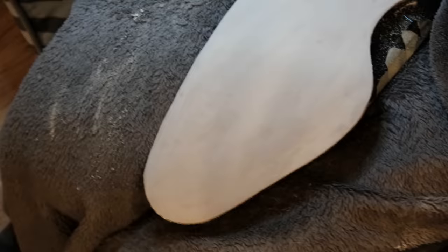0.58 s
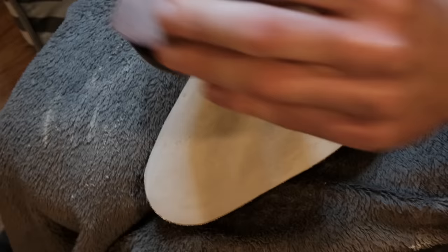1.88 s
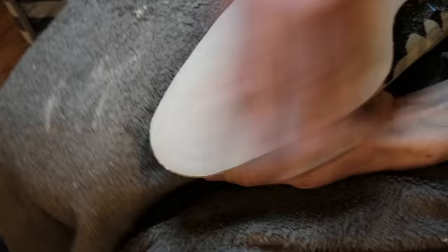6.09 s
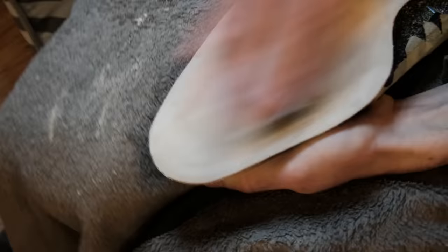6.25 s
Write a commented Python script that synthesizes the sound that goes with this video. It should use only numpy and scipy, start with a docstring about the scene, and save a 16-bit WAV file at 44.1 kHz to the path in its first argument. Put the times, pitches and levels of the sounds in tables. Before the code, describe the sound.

At the very start a shoe shifts on a lap with a soft bump and a small crunch, and a hand wipes once along the leather sole, a swish gone by 0.5 seconds. Faint rustles and a few clicks follow as sandpaper is handled. From about 1.5 to 4 seconds the stiff paper is folded and gripped, sliding over the fingers and crackling with many sharp, irregular snaps, busiest near the end. A quieter second follows, with light rustles and a few ticks. At 5 seconds the sanding starts: a dry, hissing rasp rubbed to and fro over the sole, about seven strokes a second, with a faint hollow tone underneath. Grit catches in small clicks, the sharpest near 5.8 seconds. The strokes continue until about 8 seconds. Everything is close, in a small, quiet, dry workshop.

```python
"""Hand-sanding a leather sole

A shoe on a lap in a quiet workshop is shifted and wiped once. Sandpaper is folded and gripped: it
slides over the fingers, and its creases buckle in snaps that ring the sole. It is then rubbed to and fro,
about seven strokes a second; countless grain impacts merge into a rasp that follows the hand's speed."""
import sys
import numpy as np
from scipy import signal
from scipy.fft import rfft, irfft
from scipy.io import wavfile
from scipy.ndimage import uniform_filter1d, minimum_filter1d

SR = 44100
rng = np.random.default_rng(int(sys.argv[2]) if len(sys.argv) > 2 else 0)


def store_pcm(level_fs):
    """Save levels as 16-bit WAV."""
    pcm = np.round(np.clip(level_fs, -1, 1) * 32767).astype(np.int16)
    wavfile.write(sys.argv[1], SR, np.atleast_2d(pcm).T)


N = 351918
TIME = np.arange(N) / SR

# spectra of the coarse rasp and the fine hiss: frequency_hz, level_db
RASP_SPECTRUM = [(100, -51), (1000, -52), (1500, -25), (1900, -15), (2400, 0.5), (3200, 2.5), (4600, -1.5),
                 (6300, -1), (8000, -4.5), (16000, -12)]
HISS_SPECTRUM = [(1500, -53), (3000, -8), (6000, 2.5), (8000, -2), (10000, 2.5), (16000, 0)]
# the hand loops round its turns at first, later stops almost dead: time_s, turn_speed_fraction
TURN_SPEEDS = [(5.0, 0), (5.16, 0.32), (6.5, 0.35), (7.35, 0.02), (7.65, 0.03), (7.85, 0.48)]
# sanding strokes, each lasting until the next: start_s, level_db, relative_hiss_db
STROKES = [(5.045, -39, -4.5), (5.164, -40, -6), (5.343, -40, -1.8), (5.484, -39, -4.5), (5.632, -40.5, -2),
           (5.771, -40, -2), (5.918, -39, -3.5), (6.055, -41, -3.5), (6.2, -39, -3), (6.339, -40.5, -2.5),
           (6.487, -39, -2), (6.639, -39, -1.5), (6.792, -39, -3), (6.934, -40.5, -2.5),
           (7.075, -40.5, -1.5), (7.213, -38.5, -0.5), (7.357, -39, -3), (7.505, -39.5, -2.5),
           (7.654, -41, 0), (7.81, -41, 0)]
TURNS_S = [row[0] for row in STROKES] + [7.985]  # the last stroke ends here


def sanding(paper_hz=4930, scatter_octaves=0.19, fastest_at=0.63):
    """Friction noise grows with sliding speed: the rasp gently, the fine hiss steeply."""
    out = np.zeros(N)
    for (start, db, hiss_db), end in zip(STROKES, TURNS_S[1:]):
        n = int((end - start) * SR)
        travel = np.interp(np.arange(n) / n, [0, fastest_at, 1], [0, .5, 1])
        slowest = np.interp(start + TIME[:n], *np.transpose(TURN_SPEEDS))
        speed = slowest + (1 - slowest) * np.abs(np.sin(np.pi * travel))
        coarse = shape(grit(n, per_s=15000, spread_db=4.0), RASP_SPECTRUM)
        # the paper under the fingers rings a little differently on each pass
        hz = paper_hz * 2 ** (scatter_octaves * rng.standard_normal())
        rasp = unit(shimmer(coarse + .75 * resonance(coarse, hz, q=3.5), share=.35))
        hiss = unit(shape(grit(n, per_s=30000, spread_db=5.5), HISS_SPECTRUM))
        pressure_db = db + 1.5 * waver(n, per_s=125.4)
        rasp_gain = amp(-0.85) * speed ** 0.7
        hiss_gain = amp(hiss_db + 2.5) * (0.025 + speed ** 2.24)
        add(out, start, amp(pressure_db) * (rasp_gain * rasp + hiss_gain * hiss))
    return out


def bites(delay_s=0.014, length_s=0.012, snap_hz=4700, crunch_hz=4200):
    """Stick-slip: the grit digs in after each turn. Returns rows of snaps and rows of crunches."""
    snap_rows, crunch_rows = [], []
    for turn, db, _ in STROKES[1:]:
        scatter_db, lag = rng.standard_normal(2)
        start, bite_db = turn + delay_s, db + scatter_db
        snap_rows.append((start + length_s * abs(lag) / 2, bite_db + 13.5, snap_hz))
        crunch_rows.append((start, length_s, bite_db - 10, crunch_hz, -np.inf))  # no knock
    return snap_rows, crunch_rows


# spectrum of the sole's hum: frequency_hz, level_db
HUM_SPECTRUM = [(60, -26), (300, -25.5), (800, -18.5), (1100, -21.5), (1400, -5.5), (1650, -1.5), (1950, 7),
                (2500, 1.5), (4000, -20)]
# level of the sole's hum, swelling and dipping sharply on some strokes: time_s, level_db
HUM_LEVELS = [(5.05, -68.5), (5.15, -50.5), (5.26, -73), (5.36, -64), (6.25, -65), (6.9, -68),
              (7.22, -60.5), (7.37, -66.5), (7.56, -57.5), (7.68, -82), (7.78, -56.5), (7.98, -70)]


def sole_hum(swing_db=3.5, lead_s=0.0075):
    """Forced vibration: the sole hums under the rasp, more as the paper nears its hollow end."""
    position = np.cos(np.pi * np.interp(TIME + lead_s, TURNS_S, np.arange(len(TURNS_S))))
    db = np.interp(TIME, *np.transpose(HUM_LEVELS), left=-120) + swing_db * position
    return amp(db + 6.0) * unit(shape(grit(N, per_s=6000, spread_db=3.5), HUM_SPECTRUM))


# the loudest snaps of the stiff paper and its grit: start_s, level_db, pitch_hz
SNAPS = [(0.4894, -43, 8000), (0.5885, -38, 7000), (0.7798, -21, 3500), (0.9334, -28.5, 7200),
         (1.3246, -27.5, 7800), (1.6168, -26, 7700), (1.7106, -23.5, 6600), (1.7847, -24, 6800),
         (1.841, -24, 5800), (1.8583, -26, 6600), (1.9029, -24.5, 3460), (1.9694, -23, 5100),
         (2.0338, -27.5, 4000), (2.052, -27, 4460), (2.1308, -28.5, 4720), (2.2047, -21.5, 2480),
         (2.222, -22, 2820), (2.246, -24.5, 3620), (2.5129, -20.5, 2840), (2.5525, -30, 3050),
         (2.5757, -22, 2830), (2.608, -20, 2930), (2.8322, -26, 3660), (2.8767, -29, 4370),
         (2.9466, -30, 6100), (2.9506, -29, 7700), (3.1279, -27.5, 7930), (3.2068, -20, 5530),
         (3.2609, -21.5, 4200), (3.2955, -23.5, 6100), (3.352, -26.5, 5100), (3.4074, -27, 6880),
         (3.4818, -21, 3800), (3.5872, -28, 6300), (3.6063, -21, 5970), (3.6346, -23, 5040),
         (3.7189, -17, 5380), (3.7882, -20, 4530), (3.8632, -24.5, 4200), (4.2197, -37.5, 5430),
         (4.314, -29.5, 2980), (4.4121, -29, 3130), (4.5406, -37, 4420), (5.7845, -13, 5250),
         (6.9515, -21, 5540), (7.0965, -21.5, 2280), (7.2031, -21, 6050), (7.378, -24, 2600),
         (7.664, -24, 4000)]


def snaps(rows):
    """Snap-through buckling: a crease pops in a cycle or two, then the sheet briefly shivers."""
    out, t = np.zeros(N), TIME[:1024]
    small_sheet = signal.butter(5, 1750, "high", fs=SR, output="sos")  # too small to radiate bass
    for start, db, hz in rows:
        shiver = rng.standard_normal(len(t)) * (np.exp(-t / 0.00057) + 0.04 * np.exp(-t / 0.007))
        push = (t == 0) + .3 * shiver
        crease = resonance(resonance(push, hz, q=1.53), hz, q=0.9)
        tick = 0.06 * (hz / 5000) ** 2 * push  # small creases also tick brightly
        pop = ring_sole(signal.sosfilt(small_sheet, crease + tick))
        add(out, start - .0001, amp(db - 3.5) * pop / np.abs(pop).max())
    return out


# spectrum of a knock on the sole: frequency_hz, level_db
KNOCK_SPECTRUM = [(60, -15), (250, -7), (550, 4.5), (900, 3), (1500, -5), (3000, -91)]
# the paper buckles or catches: start_s, length_s, level_db, centre_hz, relative_knock_db
CRUNCHES = [(0.003, 0.038, -41.5, 2820, -22), (0.587, 0.038, -46.5, 2240, -20.5),
            (0.645, 0.0072, -50.5, 4540, -5), (0.774, 0.023, -48.5, 2270, -18.5),
            (0.925, 0.038, -45.5, 2380, -29), (1.892, 0.023, -54, 3850, -7),
            (2.192, 0.059, -47.5, 2600, -14), (2.606, 0.0066, -41.5, 3270, -24.5),
            (2.667, 0.0059, -45.5, 3260, -44), (2.818, 0.023, -53.5, 3800, -18),
            (2.963, 0.02, -45.5, 3630, -34), (3.18, 0.026, -44.5, 3520, -25), (3.25, 0.022, -43, 3600, -17),
            (3.478, 0.0034, -37, 3880, -28), (4.405, 0.021, -49, 2397, -16.5),
            (5.357, 0.019, -37.5, 4000, -53), (5.649, 0.043, -39.5, 3570, -50),
            (6.062, 0.043, -40, 4830, -52), (7.084, 0.012, -43, 2610, -41), (7.365, 0.0053, -36, 2800, -48)]


def crunches(rows):
    """Mechanical coupling: a quick run of slips in the paper also drives the sole beneath."""
    out, t = np.zeros(N), TIME[:8192]
    for start, length, db, hz, knock_db in rows:
        small_sheet = signal.butter(4, min(1750, 0.66 * hz), "high", fs=SR, output="sos")
        slips = grit(len(t), per_s=3500, spread_db=3.5)
        paper = signal.sosfilt(small_sheet, resonance(resonance(slips, hz, q=0.87), hz, q=0.2))
        knock = amp(knock_db) * unit(shape(slips, KNOCK_SPECTRUM))
        envelope = burst(t, length, rise_s=0.0005, fall_s=0.0065)
        add(out, start, amp(db - 2.0) * envelope * (unit(ring_sole(paper)) + knock))
    return out


# modes of the leather sole: pitch_hz, quality_factor, gain_db
SOLE_MODES = [(2300, 13, 3), (2630, 18, 1), (3500, 18, 6), (4300, 14, 1)]


def ring_sole(x):
    """Modal response: the leather adds its short ring to the sound that excites it."""
    return x + sum(amp(db) * resonance(x, hz, q) for hz, q, db in SOLE_MODES)


# spectrum of the brushing hand: frequency_hz, level_db
WIPE_SPECTRUM = [(200, -32), (600, -29), (950, -27), (1250, -18), (1600, -5), (1950, -1.5), (3200, -5),
                 (4400, -1.5), (6000, -5), (8000, -7.5), (16000, -7)]
# one wipe along the sole: time_s, level_db, gap_resonance_hz
WIPE_PATH = [(0.061, -62, 1900), (0.085, -45, 2000), (0.115, -38.5, 2300), (0.17, -38, 5050),
             (0.24, -38.5, 4700), (0.35, -41, 3770), (0.378, -52, 3760), (0.47, -65.5, 1970),
             (0.571, -75.5, 2000)]


def wipe():
    """Cavity resonance: the gap under the hand colours its friction noise, rising and then sinking."""
    times, level_db, gap_hz = np.transpose(WIPE_PATH)
    db = np.interp(TIME, times, level_db, left=-120, right=-120)
    brush = shape(grit(N, per_s=21000, spread_db=3.0), WIPE_SPECTRUM)
    brush = unit(brush + 1.8 * glide(brush, np.interp(TIME, times, gap_hz)))
    # the sole sounds hollow while the hand lands on it
    landing = np.exp(-((TIME - .11) / 0.053) ** 2) * unit(shape(rng.standard_normal(N), KNOCK_SPECTRUM))
    return amp(db + 0.56 * waver(N, per_s=170)) * (brush + amp(-16.5) * landing)


# spectrum of the fine hiss in each rustle: frequency_hz, level_db
RUSTLE_HISS_SPECTRUM = [(2500, -25), (4500, -12), (6500, 2), (8500, -2.5), (10500, -2), (16000, 3)]
# paper slides in the fingers and, at 3.959 s, a faint, breathy hiss between the slides:
# start_s, length_s, level_db, resonance_hz, relative_hiss_db
RUSTLES = [(0.602, 0.18, -64.5, 2100, 0), (0.79, 0.3, -56.5, 2040, -8.5), (1.128, 0.37, -67.5, 3200, -3.5),
           (1.316, 0.064, -57.5, 2180, -1), (1.57, .16, -60.5, 4840, -9), (1.745, 0.19, -57.5, 2400, -12),
           (1.972, 0.17, -58.5, 2220, -3), (2.151, 0.09, -50.5, 2170, -9), (2.476, 0.26, -63, 2320, -12),
           (2.763, .22, -58, 2630, -11), (3.141, 0.19, -59.5, 2640, -7), (3.355, 0.099, -47.5, 2490, -1),
           (3.478, 0.14, -57, 2300, -18), (3.642, 0.11, -45, 2650, -3), (3.77, 0.18, -51, 2435, -7.5),
           (3.959, 0.35, -74.5, 1910, 1.5), (4.282, 0.15, -57, 2310, -13), (4.5, 0.32, -61, 2620, -8),
           (4.848, 0.17, -53, 2100, -4)]


def rustles(rise_s=0.022, overtone_ratio=1.536):
    """Noise excites two resonances: paper sliding on skin, retuned by each grip, or a breathy hiss."""
    out, t = np.zeros(N), TIME[:32768]
    for start, length, db, low_hz, hiss_db in RUSTLES:
        dense = grit(len(t), per_s=14000, spread_db=2.0)
        sparse = grit(len(t), per_s=340, spread_db=6)
        grains = unit(dense + amp(-3.0) * sparse) * amp(2.12 * waver(len(t), per_s=70.5))
        overtone = resonance(grains, overtone_ratio * low_hz, q=2.15)
        body = resonance(grains, low_hz, q=3.4) + 0.74 * overtone + 0.058 * grains
        body = shape(shimmer(body), [(low_hz * 0.42, -22), (low_hz, 0), (7500, 0), (11000, -10)])
        hiss = amp(hiss_db) * unit(shape(grains, RUSTLE_HISS_SPECTRUM))
        swell = burst(t, length, rise_s, fall_s=0.03)
        tail = amp(-30.5) * burst(t, length, rise_s, fall_s=0.36)
        add(out, start - rise_s / 2, amp(db) * (swell + tail) * (unit(body) + hiss))
    return out


def folding_ticks(from_s=1.55, until_s=3.9, per_s=42, centre_hz=6000, count=14):
    """Small creases buckle at random during folding, louder in firmer slides. Returns rows of snaps."""
    rows = []
    for start, length, db, _, _ in RUSTLES:
        delays = np.cumsum(rng.gamma(2, .5, count)) / per_s
        for delay, (force, pitch) in zip(delays, rng.standard_normal((count, 2))):
            if delay < length and from_s < start + delay < until_s:
                rows.append((start + delay, db + 19 + 4.5 * force, centre_hz * 2 ** (0.32 * pitch)))
    return rows


def shimmer(x, share=1.0):
    """Changing boundary conditions: narrow modes of the paper come and go as the fingers shift."""
    pitches_hz = 1900 * 2 ** rng.uniform(0, 2, 10)
    return x + share * sum(resonance(x, hz, q=14) * waver(len(x), per_s=23.3) for hz in pitches_hz)


# the shoe bumps on the lap: start_s, length_s, level_db, pitch_hz
BUMPS = [(0.008, 0.034, -47.5, 97), (0.053, 0.037, -56, 146), (0.59, 0.065, -72.5, 210),
         (5.769, .06, -82, 62), (6.074, 0.02, -76, 62), (7.752, 0.041, -72.5, 126)]


def knee_bumps():
    """Damped impact: the padded contact of shoe and knee gives a low, soft thud."""
    out, t = np.zeros(N), TIME[:16384]
    for start, length, db, hz in BUMPS:
        thud = resonance(resonance(rng.standard_normal(len(t)), hz, q=2.2), hz, q=0.5)
        thud *= burst(t, length, rise_s=0.0013, fall_s=0.025)
        contact_rms = np.sqrt(np.sum(thud ** 2) / (length * SR))
        add(out, start, amp(db) * thud / contact_rms)
    return out


# spectrum of the still workshop: frequency_hz, level_db
AIR_SPECTRUM = [(30, -1.5), (70, -2), (200, -2.5), (400, 0), (800, -3), (1130, 5.5), (1600, -6.5),
                (2400, -4), (3500, -16.5), (7000, -2), (10000, -24.5), (15500, -31)]


def room_air(level_db=-76):
    """Stationary noise: the faint, steady background of the room."""
    return amp(level_db) * unit(shape(rng.standard_normal(N), AIR_SPECTRUM))


def echoes(length_s, t60_s):
    """Diffuse reverberation: dense reflections of unit energy that decay exponentially."""
    t = TIME[:int(length_s * SR)]
    tail = rng.standard_normal(len(t)) * np.exp(-np.log(1000) * t / t60_s)
    return tail / np.linalg.norm(tail)


def grit(n, per_s, spread_db):
    """Shot noise: grains catch at random, many small and a few large; rms 1."""
    caught = rng.random(n) < per_s / SR
    size = amp(spread_db * np.minimum(rng.exponential(size=n), 4))
    return unit(caught * size * rng.choice([-1, 1], n))


def waver(n, per_s):
    """Random modulation: a continuous wander with a spread near 1."""
    knots = rng.standard_normal(int(n / SR * per_s) + 2)
    return np.interp(np.arange(n) / SR * per_s, np.arange(len(knots)), knots)


def burst(t, length_s, rise_s, fall_s):
    """Exponential envelope: a sound builds up, holds and dies away."""
    return (1 - np.exp(-t / rise_s)) * np.exp(-np.maximum(t - length_s, 0) / fall_s)


def resonance(x, hz, q):
    """Damped oscillator: a two-pole band-pass, gain 1 at the centre."""
    return signal.lfilter(*signal.iirpeak(min(hz, SR / 3), max(q, hz * 4 / SR), fs=SR), x)


def glide(x, hz):
    """Moving resonance: a crossfade between fixed bands follows the curve hz."""
    centres = np.geomspace(1800, 6400, 12)
    step = np.log(centres[1] / centres[0])
    weights = (np.maximum(1 - np.abs(np.log(hz / centre)) / step, 0) for centre in centres)
    return sum(weight * resonance(x, centre, q=0.88) for centre, weight in zip(centres, weights))


def shape(x, spectrum):
    """Spectral filtering by (frequency_hz, level_db) points."""
    hz, db = np.transpose(spectrum)
    bins_hz = np.maximum(np.fft.rfftfreq(len(x), 1 / SR), 1)
    return irfft(rfft(x) * amp(np.interp(np.log(bins_hz), np.log(hz), db)), len(x))


def amp(db):
    """Decibels to amplitude ratio."""
    return 10 ** (np.asarray(db) / 20)


def unit(x):
    """Normalisation to rms 1."""
    return x / np.sqrt(np.mean(x ** 2) + 1e-20)


def add(out, start_s, x):
    """Superposition of a short sound at start_s."""
    i = max(int(start_s * SR), 0)
    out[i:i + len(x)] += x[:max(N - i, 0)]


def friction():
    """Superposition of the rubbing and rustling, with fresh grains on each call."""
    return sanding() + sole_hum() + wipe() + rustles()


# stereo width: frequency_hz, side_minus_mid_db
WIDTH_SPECTRUM = [(100, -29), (700, -15.5), (1300, -9.5), (2400, -10), (4400, -9), (8000, -2), (11000, -6),
                  (15000, -13.5)]


def scene(room_t60_s=.3, room_db=-15):
    """Decorrelation between left and right widens the close sounds in a small, dry room."""
    rubbing = friction()
    bite_snaps, bite_crunches = bites()
    crackle = snaps(SNAPS + bite_snaps + folding_ticks()) + crunches(CRUNCHES + bite_crunches)
    direct = rubbing + crackle
    mid = direct + room_air()
    side_air = room_air()
    nearby = np.pad(echoes(.008, t60_s=.009), (int(.0003 * SR), 0))  # reflections off hand and shoe
    # grains catch all across the sheet, so part of the rubbing differs between left and right
    side = shape(friction() + signal.fftconvolve(crackle, nearby)[:N] + side_air, WIDTH_SPECTRUM)
    room = np.array([signal.fftconvolve(direct, echoes(.4, room_t60_s))[:N] for _ in range(2)])
    thuds = knee_bumps() * amp([[-2.5], [2.5]])  # the knees are to the right
    return np.array([mid + side, mid - side]) + amp(room_db) * room + thuds


def record(dry, cutoff_hz=15900, ceiling_db=-23.3):
    """Band and peak limiting: the top treble is cut and the level dips briefly at the sharpest peaks."""
    sound = signal.sosfilt(signal.ellip(10, .2, 70, cutoff_hz, fs=SR, output="sos"), dry)
    gain = np.minimum(1, amp(ceiling_db) / (np.abs(sound).max(axis=0) + 1e-9))
    return sound * uniform_filter1d(minimum_filter1d(gain, size=65), size=65)


dry = scene()
out = record(dry)
store_pcm(out)
```